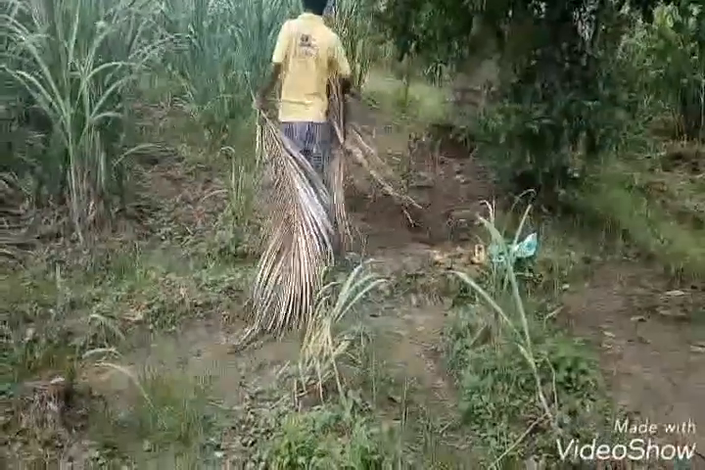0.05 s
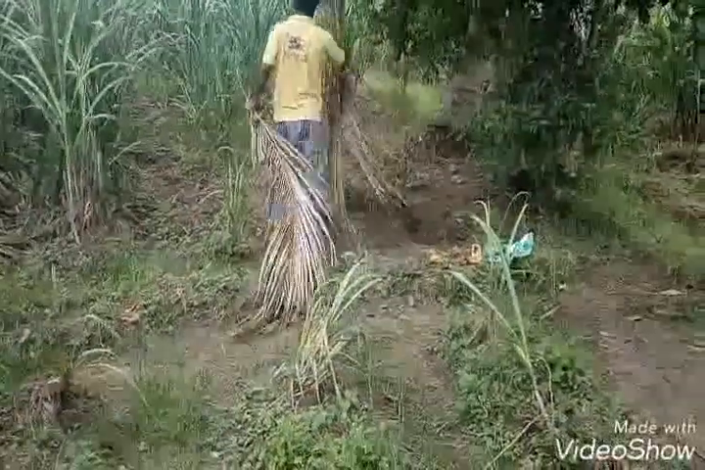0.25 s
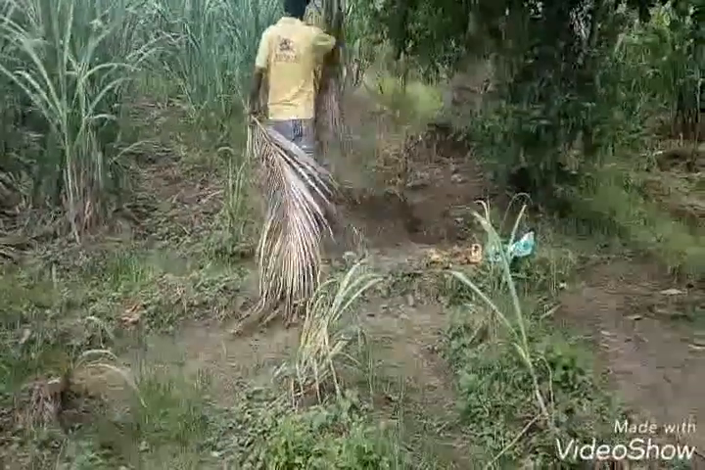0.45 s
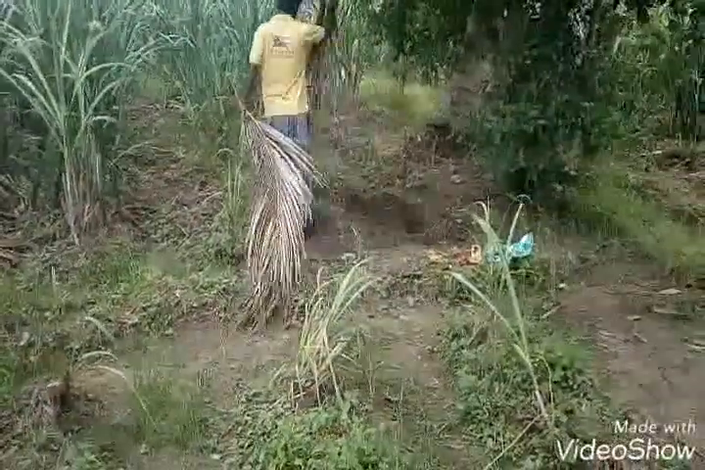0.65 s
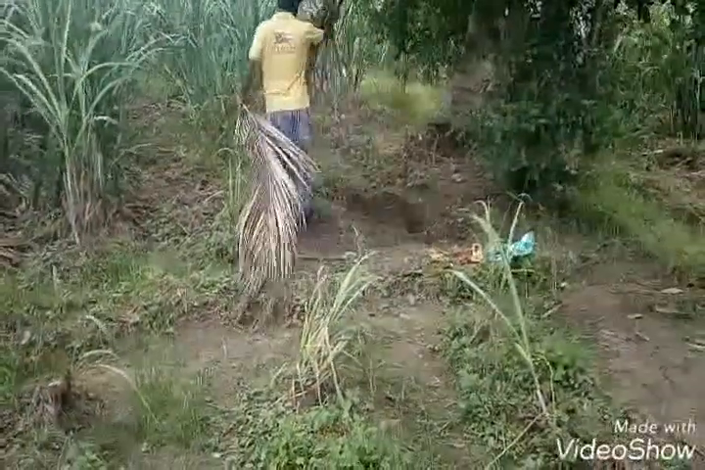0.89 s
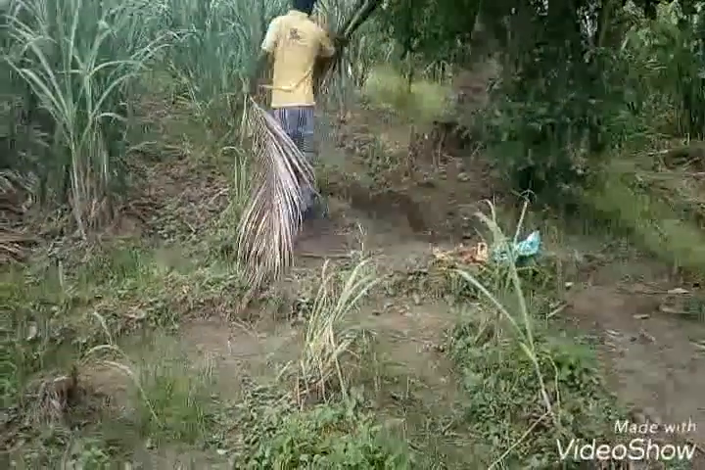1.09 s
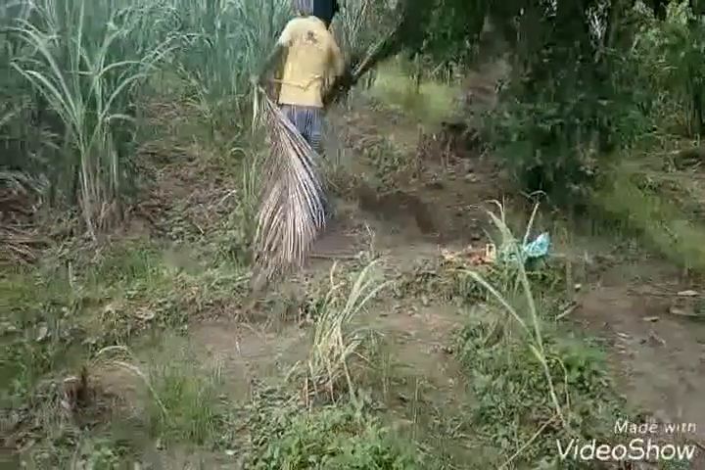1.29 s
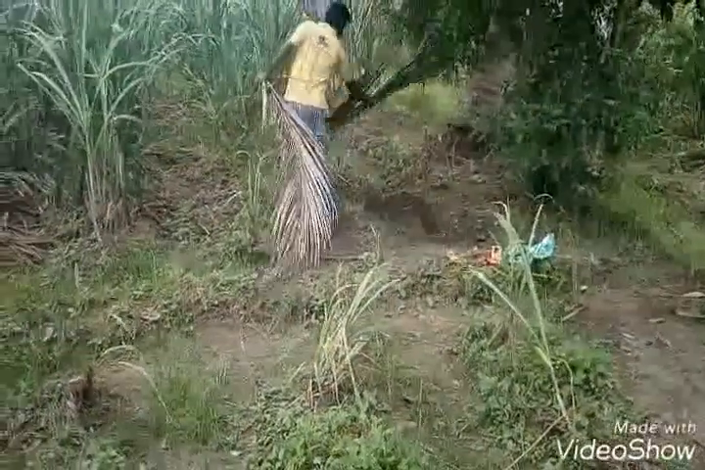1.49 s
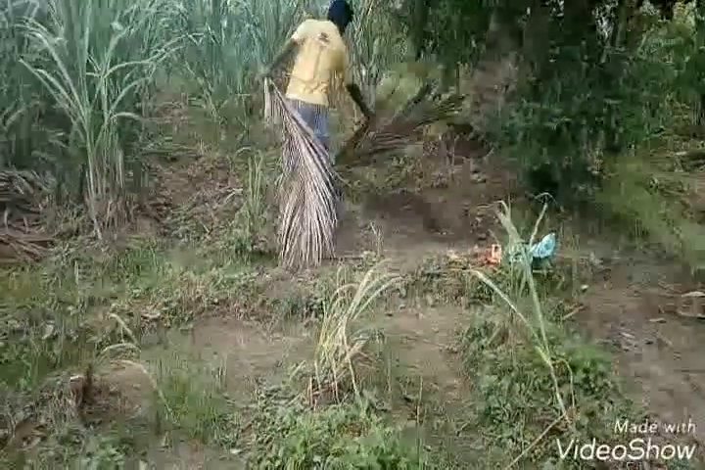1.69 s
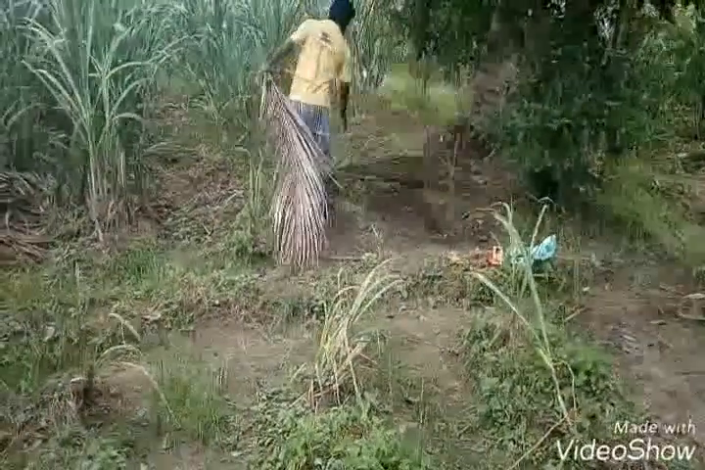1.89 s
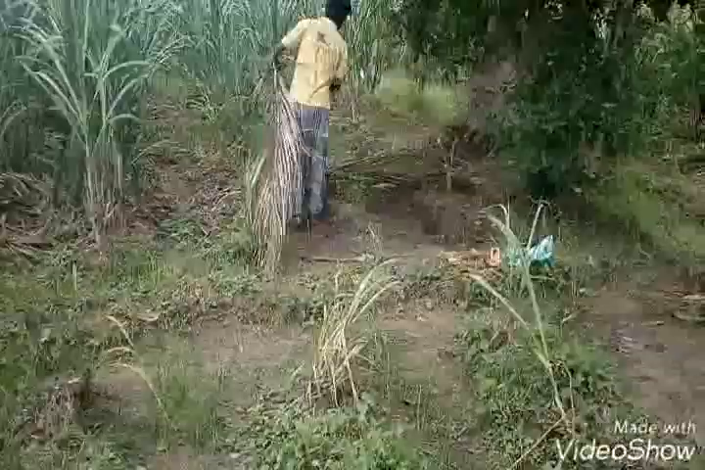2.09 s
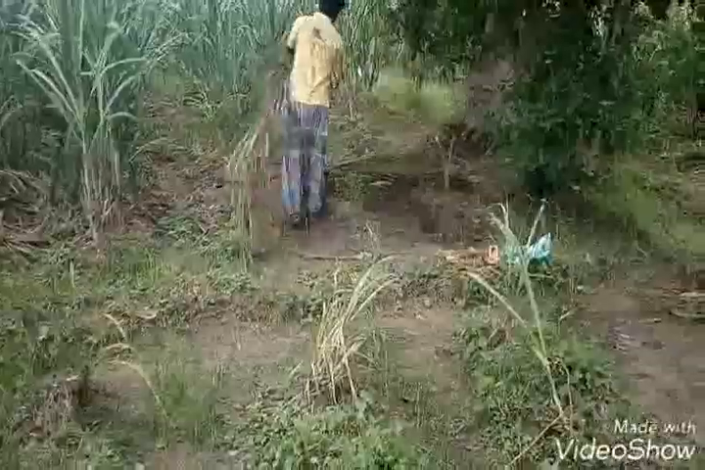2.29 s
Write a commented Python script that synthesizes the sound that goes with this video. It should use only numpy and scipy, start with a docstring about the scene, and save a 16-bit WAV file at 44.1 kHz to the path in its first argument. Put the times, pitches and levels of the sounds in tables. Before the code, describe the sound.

Dry palm fronds rustle outdoors. Low wind first buffets the microphone over a soft hiss, then a frond brushes past with crackling leaflets, swings down to sweep the soil and settles with a faint knock.

```python
"""Dry palm fronds are carried over a field. First, wind buffets the two microphone ports in turn over a soft
outdoor hiss, which steps up on the left at 0.6 s and 1.1 s. At 1.5 s a frond brushes past, a little to the
right, its stiff leaflets crackling and snapping. At 1.7 s it swings down, knocks its stalk on the ground
and sweeps the dry soil. From 2.1 s it settles with a second knock and a last rustle."""
import sys
import numpy as np
from scipy import signal
from scipy.fft import rfft, irfft, next_fast_len
from scipy.io import wavfile
from scipy.ndimage import uniform_filter1d

SR = 44100
rng = np.random.default_rng(int(sys.argv[2]) if len(sys.argv) > 2 else 0)


def int16_out(signal):
    """Quantize to a 16-bit WAV file."""
    q = np.round(np.clip(np.atleast_2d(signal).T, -1, 1) * 32767)
    wavfile.write(sys.argv[1], SR, q.astype(np.int16))


N = 108045
T = np.arange(N) / SR

# spectra of the frond's body and its thin tips: f/Hz, relative level/dB
FROND_SPECTRUM = [(300, -56), (800, -27.5), (1900, -28), (2600, -18.5), (3100, -10), (3750, -4),
                  (4200, -11), (4800, -9.5), (6200, -12), (7600, -24.5), (9300, -28), (11500, -33),
                  (15000, -45)]
TIPS_SPECTRUM = [(2000, -32), (5000, -18), (7500, -1.5), (10000, -8), (13000, -12.5), (15000, -19)]


def from_db(db):
    return 10 ** (np.asarray(db) / 20)


def unit_rms(x):
    return x / np.sqrt(np.mean(x ** 2) + 1e-20)


def envelope(curve):
    """Gain from (t/s, level/dB) points; fades to silence 20-40 ms outside them."""
    t_s, db = np.transpose(curve)
    inside_s = np.minimum(T - t_s[0], t_s[-1] - T)
    return from_db(np.interp(T, t_s, db)) * np.clip(inside_s * 50 + 2, 0, 1)


def colour(x, spectrum):
    """Minimum-phase filter through (f/Hz, gain/dB) points."""
    size = next_fast_len(N + SR // 4) // 2 * 2
    hz, db = np.transpose(spectrum)
    bins_hz = np.maximum(np.arange(size // 2 + 1) * SR / size, 1)
    gain = from_db(np.interp(np.log(bins_hz), np.log(hz), db))
    cepstrum = irfft(np.log(gain))
    cepstrum[1:size // 2] *= 2
    cepstrum[size // 2 + 1:] = 0
    return irfft(rfft(x, size) * np.exp(rfft(cepstrum)))[:N]


def noise(spectrum):
    """Coloured noise, unit rms."""
    return unit_rms(colour(rng.standard_normal(N), spectrum))


def drift(hz):
    """Slow random wander, unit rms."""
    pole = np.exp(-2 * np.pi * hz / SR)
    return unit_rms(signal.lfilter([1], [1, -2 * pole, pole * pole], rng.standard_normal(N + SR))[SR:])


def from_right(direct, scattered, lag_s=0.00008, direct_gain=0.18):
    """The left port hears the frond later, shaded and mostly scattered."""
    # shading at the left port: f/Hz, gain/dB
    shade = [(600, -0.5), (1200, -1), (2100, 2.5), (3600, -14), (4800, -8.5), (7000, -12.5), (9000, -10),
             (11000, -0.5), (14000, -21)]
    left = direct_gain * np.roll(direct, int(lag_s * SR)) + np.sqrt(1 - direct_gain ** 2) * scattered
    return np.array([colour(left, shade), direct])


def rustle(flutter_db=1.14, flutter_hz=43.7, ring_db=-10):
    """Strokes of the frond: fluttering crackle and ringing leaflets, each stroke with its own spectrum."""
    # strokes: t/s, level/dB
    brush = [(1.46, -63.5), (1.49, -50.5), (1.522, -52), (1.545, -52.5), (1.567, -44.5), (1.598, -50.5),
             (1.645, -72)]
    swing = [(1.69, -75), (1.708, -50), (1.74, -44.5), (1.77, -39.5), (1.815, -41), (1.85, -37.5),
             (1.9, -37.5), (1.95, -44), (2.01, -50.5), (2.07, -61), (2.13, -48.5), (2.2, -52)]
    scrape = [(1.69, -75), (1.71, -62), (1.8, -63), (1.85, -52.5), (1.885, -46), (1.925, -47), (1.955, -61),
              (2.0, -79)]  # leaflets over dry soil
    settle = [(2.07, -52), (2.105, -53.5), (2.16, -60.5), (2.215, -47), (2.3, -53), (2.36, -61.5),
              (2.45, -66)]
    tips = [(0, -66), (.08, -83), (.14, -63.5), (.21, -75), (.6, -74), (.86, -65.5), (.94, -71.5),
            (2.0, -92), (2.33, -69.5), (2.41, -75), (2.43, -57), (2.45, -64)]  # thin, bright brushing of leaf tips
    # their spectra: f/Hz, relative level/dB
    brush_spectrum = [(300, -66), (800, -4.5), (1100, -16), (1700, -6), (2600, -7), (3300, 6), (3900, 1),
                      (4600, 1), (5400, -12), (7500, -16), (14000, -37)]
    scrape_spectrum = [(200, -16), (480, -16), (760, -6), (950, -7), (1170, 0), (1350, -4), (1570, -1),
                       (1950, -12), (2700, -7), (5000, -10), (9000, -8), (12000, -16), (15000, -21)]
    settle_spectrum = [(300, -59), (800, -23), (1900, -26), (2800, -22), (3300, -7), (3750, -0.5),
                       (4200, -5.5), (4800, -4.5), (6200, -3.5), (7600, -17), (9300, -18), (11500, -19.5),
                       (15000, -44)]
    strokes = [(brush, brush_spectrum), (swing, FROND_SPECTRUM), (settle, settle_spectrum),
               (scrape, scrape_spectrum), (tips, TIPS_SPECTRUM)]
    rings = [from_db(ring_db) * leaflet_ring() for _ in range(2)]
    out = np.zeros((2, N))
    for curve, spectrum in strokes:
        gain = envelope(curve) * from_db(flutter_db * drift(flutter_hz))
        direct, scattered = [gain * unit_rms(colour(crackle() + ring, spectrum)) for ring in rings]
        out += from_right(direct, scattered)
    return out


def crackle(ticks_per_s=2600, spread_db=5.5, cap_db=12, tick_share=0.64):
    """Dense ticks of uneven size over the smooth hiss of sliding leaves."""
    sizes_db = np.minimum(spread_db * rng.exponential(1, N), cap_db)
    sizes = from_db(sizes_db) * rng.choice([-1, 1], N)
    ticks = unit_rms(sizes * (rng.random(N) < ticks_per_s / SR))
    return np.sqrt(tick_share) * ticks + np.sqrt(1 - tick_share) * rng.standard_normal(N)


def leaflet_ring(count=40, low_hz=2900, high_hz=10075, t60_s=0.082, flicks_per_s=28):
    """Flicked leaflets ring briefly, each at its own pitch."""
    out = np.zeros(N)
    radius = from_db(-60 / (t60_s * SR))
    for place in (np.arange(count) + rng.random(count)) / count:
        hz = low_hz + place * (high_hz - low_hz)
        resonator = [1, -2 * radius * np.cos(2 * np.pi * hz / SR), radius ** 2]
        flicks = rng.standard_normal(N) * (rng.random(N) < flicks_per_s / SR)
        out += signal.lfilter([1, 0, -1], resonator, flicks + 1e-12 * rng.random(N))
    return unit_rms(out)


def leaflet_snaps():
    """Stiff leaflets crack and splinter for milliseconds, heard through the frond's body and tips."""
    # t/s, relative level/dB, decay/s, opening crack/dB, body low-pass/Hz, tips gain/dB
    snaps = [(1.4815, -36, .003, 4, 4000, -36), (1.5345, -25, .004, 2, 4000, -38),
             (1.553, -30, .005, 2, 4000, -36), (1.5765, -29.5, .005, 2, 4400, -36),
             (1.5828, -30, .0015, 6, 4400, -36), (1.708, -26.5, .005, 3, 4200, -32),
             (1.754, -28, .004, 3, 6000, -16), (1.7635, -17.5, .0013, 16, 6800, -27),
             (1.836, -18, .004, 6, 4800, -28), (1.8515, -23, .0015, 10, 6500, -22),
             (1.8953, -20, .0014, 14, 6800, -22), (1.9188, -20.5, .002, 13, 6800, -15),
             (2.11, -22, .002, 8, 4100, -34), (2.138, -31, .002, 10, 5000, -26),
             (2.1855, -26.5, .002, 8, 6800, -22), (2.2255, -31, .0012, 14, 6500, -22),
             (2.382, -39, .004, 3, 5000, -24), (2.4257, -39, .0012, 14, 8000, 1)]
    body, tips = np.zeros((2, N)), np.zeros((2, N))
    age_s = np.arange(SR // 20) / SR
    for t_s, db, decay_s, crack_db, top_hz, tips_db in snaps:
        burst = rng.choice([-1, 1], (2, len(age_s))) * np.exp(-age_s / decay_s)
        burst[:, 0] = from_db(crack_db)
        start = int(t_s * SR)
        burst = from_db(db) * burst[:, :N - start]
        lowpass = signal.butter(4, top_hz, fs=SR, output="sos")
        body[:, start:start + len(age_s)] += signal.sosfilt(lowpass, burst)
        tips[:, start:start + len(age_s)] += from_db(tips_db) * burst
    body /= from_db(max(db for _, db in FROND_SPECTRUM))
    direct, scattered = [colour(b, FROND_SPECTRUM) + colour(t, TIPS_SPECTRUM) for b, t in zip(body, tips)]
    return from_right(direct, scattered)


def stalk_knocks(chatter_s=0.003, highpass_hz=656):
    """The woody stalk chatters on the ground, which sets it ringing roughly."""
    # ground contacts: t/s, relative level/dB
    knocks = [(1.709, -57), (2.11, -59)]
    # stalk modes: f/Hz, gain/dB, t60/s
    modes = [(786, 5.5, 0.051), (1190, -6, 0.02), (3300, 24, 0.014)]
    force = np.zeros(N)
    age_s = np.arange(SR // 10) / SR
    for t_s, db in knocks:
        chatter = rng.standard_normal(len(age_s)) * np.exp(-age_s / chatter_s)
        start = int(t_s * SR)
        force[start:start + len(age_s)] += from_db(db) * chatter / np.linalg.norm(chatter)
    ring = sum(from_db(db - 60 * age_s / t60_s) * np.sin(2 * np.pi * hz * age_s) for hz, db, t60_s in modes)
    highpass = signal.butter(4, highpass_hz, "high", fs=SR, output="sos")
    knock = signal.sosfilt(highpass, signal.fftconvolve(force, ring)[:N])
    return from_right(knock, knock)


def wind_rumble(smooth_s=0.076):
    """Wind buffets each microphone port with its own rumble."""
    # gusts at each port: t/s, level/dB
    left_gusts = [(0.0, -54), (0.08, -58.5), (0.27, -26.5), (0.32, -36.5), (0.4, -80), (0.45, -49.5),
                  (0.55, -59.5), (0.67, -64), (0.72, -37.5), (0.81, -64), (0.89, -44), (1.01, -91),
                  (1.07, -50.5), (1.14, -62.5), (1.2, -44), (1.28, -58), (1.58, -52), (1.63, -66),
                  (1.75, -59), (1.95, -65.5), (2.18, -74), (2.42, -74), (2.44, -52.5)]
    right_gusts = [(0.0, -47), (0.05, -41), (0.122, -62.5), (0.29, -57), (0.329, -35), (0.52, -34.5),
                   (0.599, -56.5), (0.7, -43.5), (0.79, -56), (0.83, -49.5), (1.01, -70), (1.52, -70),
                   (1.59, -52), (1.658, -67.5), (1.731, -36.5), (1.83, -74), (2.13, -69), (2.3, -54),
                   (2.36, -70.5), (2.44, -73)]
    # rumble: f/Hz, relative level/dB
    spectrum = [(20, -8), (45, -23), (65, 5), (150, 0.5), (250, -11.5), (350, -17.5), (600, -40.5),
                (1200, -49.5), (3000, -69)]
    ports = []
    for gusts in (left_gusts, right_gusts):
        flow = noise(spectrum)
        power = uniform_filter1d(flow ** 2, int(smooth_s * SR))
        power = uniform_filter1d(power, int(smooth_s * SR / 2))
        steady_flow = unit_rms(flow / np.sqrt(power))
        ports.append(steady_flow * envelope(gusts))
    return np.array(ports)


def wind_eddies(skew=0.13, fizz_db=-23.5, fizz_ref_hz=158):
    """Single eddies hit a port with lopsided thumps, the faster ones with a little fizz."""
    # t/s, level/dB, f/Hz, half length/s, port (0 left, 1 right)
    eddies = [(0.049, -37, 127.4, 0.016, 1), (0.195, -29, 196, 0.0018, 0), (0.258, -23.5, 218, 0.002, 0),
              (.274, -29.5, 306, 0.0016, 0), (0.2769, -18.5, 173.2, 0.0079, 0), (0.31, -19, 127, 0.0023, 0),
              (0.347, -24, 224, 0.0039, 1), (0.38, -30, 77, 0.0058, 1), (0.4, -19.5, 108, 0.0024, 1),
              (0.445, -21, 108, 0.0025, 1), (0.46, -15, 125, 0.002, 1), (0.495, -28.5, 146, 0.004, 1),
              (.518, -22, 115, 0.0063, 1), (0.691, -35.5, 55, 0.013, 1), (1.381, -44.5, 107, 0.005, 0),
              (1.422, -35.5, 124, 0.0011, 0), (1.484, -35.5, 199, 0.0035, 0), (1.497, -31, 134, 0.0018, 0),
              (1.565, -33.5, 102, 0.0034, 0), (1.729, -35.5, 80, 0.0049, 1)]
    # fizz: f/Hz, relative level/dB
    fizz_spectrum = [(100, -3), (300, -4), (700, -16), (1200, -28.5), (3000, -67)]
    fizz = from_db(fizz_db) * noise(fizz_spectrum)
    ports = np.zeros((2, N))
    for t_s, db, hz, half_s, port in eddies:
        phase = 2 * np.pi * (hz * (T - t_s) + rng.random())
        pulse = 1 / np.cosh(np.clip((T - t_s) / half_s, -20, 20))
        roughness = skew * np.sin(2 * phase) + fizz * (hz / fizz_ref_hz) ** 2
        ports[port] += from_db(db) * pulse * (np.sin(phase) + pulse * roughness)
    return ports


def outdoor_hiss(left_db=-3, right_db=-3.5):
    """Soft hiss, independent on each side."""
    # hiss: t/s, relative level/dB
    curve = [(0, -56.5), (.15, -57.5), (.21, -60), (.6, -61), (1.0, -61.5), (1.3, -58), (1.48, -62.5),
             (1.66, -60), (2.0, -57.5), (2.45, -59)]
    # each side: f/Hz, relative level/dB
    left_spectrum = [(30, 2), (200, -10), (450, -12.5), (800, -8.5), (1300, -6.5), (2400, 0), (3500, -2.5),
                     (4800, -3), (6300, -5), (8200, -13), (11500, -18), (13500, -35)]
    right_spectrum = [(30, -40), (200, 2.5), (550, -15), (1000, -15.5), (1400, -2), (2400, 4.5),
                      (4000, 4.5), (6500, 1.5), (7800, -8.5), (10000, -4.5), (12500, -16), (15000, -25)]
    left = from_db(left_db) * noise(left_spectrum)
    right = from_db(right_db) * noise(right_spectrum)
    return envelope(curve) * np.array([left, right])


def distant_wash(left_db=-13.5):
    """Dull background wash, mostly on the right."""
    # wash: t/s, level/dB
    curve = [(0, -63), (.3, -67), (.45, -73.5), (.75, -75), (.92, -66), (1.3, -67), (1.47, -67.5),
             (1.65, -79.5), (1.95, -92), (2.33, -79.5), (2.44, -69.5)]
    # f/Hz, relative level/dB
    spectrum = [(100, -23), (300, -5), (520, 4), (720, 2.5), (1000, -5.5), (1600, -10.5), (3000, -30)]
    return envelope(curve) * np.array([from_db(left_db) * noise(spectrum), noise(spectrum)])


def hiss_steps(edge_s=0.0095):
    """Stretches of extra hiss switch on and off on the left."""
    # stretches: start/s, end/s, level/dB
    steps = [(0.597, 0.902, -53.5), (1.102, 1.455, -53.5), (1.446, 1.576, -61)]
    # f/Hz, relative level/dB
    spectrum = [(100, -10.5), (350, 2), (700, -0.5), (1400, -2.5), (2100, 4), (2750, 4), (3300, -1),
                (4300, 0), (6000, -1.5), (8200, -14), (10400, -13), (11800, -55)]
    gain = np.zeros(N)
    for start_s, end_s, db in steps:
        inside_s = np.minimum(T - start_s, end_s - T)
        gain += from_db(db) * np.clip(inside_s / edge_s + 0.5, 0, 1)
    return np.array([gain * noise(spectrum), np.zeros(N)])


def suppress_noise(x, floor_db=-22):
    """Noise suppressor: time-frequency patches under a threshold are turned down."""
    # threshold: f/Hz, power density/dB
    threshold = [(200, -130), (450, -107), (750, -106.5), (1200, -111), (2000, -125), (10000, -125),
                 (12000, -119)]
    bins_hz, _, frames = signal.stft(x, SR, nperseg=1024, scaling="psd")
    power = uniform_filter1d(2 * abs(frames) ** 2, size=5, axis=1)
    power = uniform_filter1d(power, size=3, axis=2)
    hz, db = np.transpose(threshold)
    threshold_power = from_db(np.interp(np.log(bins_hz + 1), np.log(hz), db)) ** 2
    margin = (power / threshold_power[:, None]) ** 2
    gain = np.maximum(margin / (1 + margin), from_db(floor_db))
    return signal.istft(frames * gain, SR, scaling="psd")[1][:, :N]


def scene():
    """Frond, wind and background as (left, right)."""
    frond = rustle() + stalk_knocks() + leaflet_snaps()
    wind = wind_rumble() + wind_eddies()
    background = outdoor_hiss() + distant_wash() + hiss_steps()
    return frond + wind + background


def record(dry, stopband_hz=15500):
    """Noise suppressor, then a steep low-pass."""
    lowpass = signal.cheby2(16, 60, stopband_hz, fs=SR, output="sos")
    return signal.sosfilt(lowpass, suppress_noise(dry))


dry = scene()
out = record(dry)
int16_out(out)
```